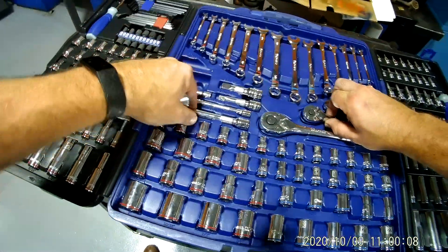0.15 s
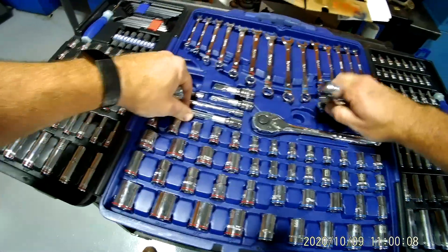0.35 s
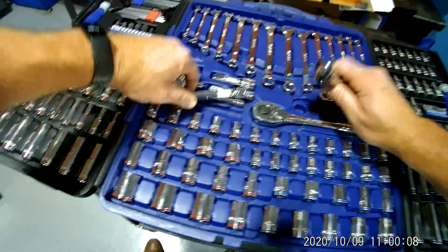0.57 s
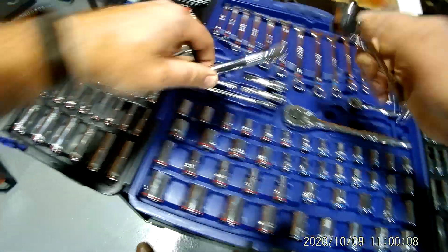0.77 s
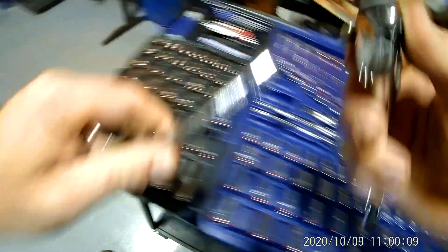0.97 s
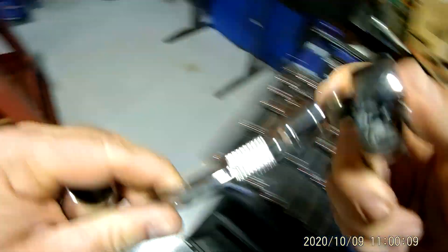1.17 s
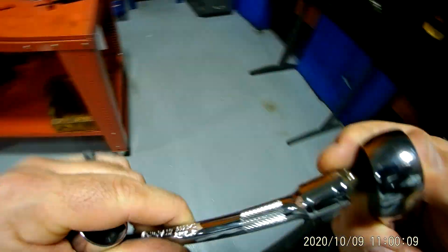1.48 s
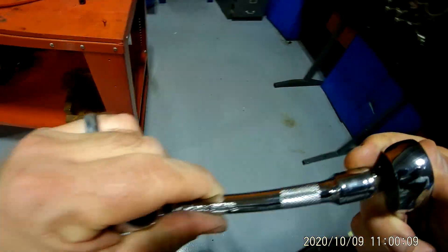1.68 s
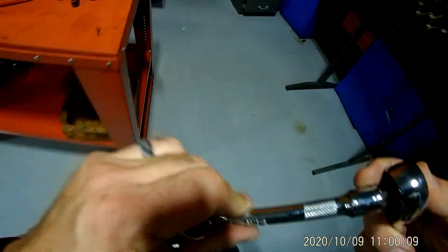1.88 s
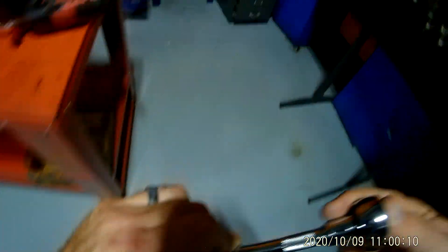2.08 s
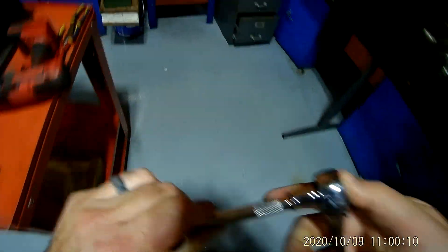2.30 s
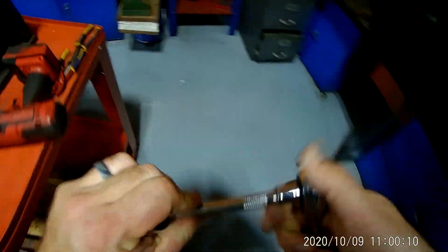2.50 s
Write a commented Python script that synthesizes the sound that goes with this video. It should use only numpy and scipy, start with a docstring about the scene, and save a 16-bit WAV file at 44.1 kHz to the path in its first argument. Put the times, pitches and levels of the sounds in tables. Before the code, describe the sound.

Close by in a hard-floored workshop, steel tools clatter in a socket tray and one clinks brightly. A tiny metal squeak and scattered clicks follow, with hands rubbing softly, then a ratchet gives a short, slowing run of clicks.

```python
"""A workshop, close up: steel tools are lifted out of a moulded socket case.
They knock in the hollow tray, jostle loose sockets and clink on one. An extension bar scrapes free
with a stick-slip squeak and clicks onto a ratchet, whose pawl then rings over its teeth in one quick,
slowing turn. Hands rub on the grip; the bench and a hard-floored room echo."""
import sys
import numpy as np
from scipy import signal
from scipy.fft import rfft, irfft
from scipy.io import wavfile
from scipy.ndimage import uniform_filter1d

SR = 44100
rng = np.random.default_rng(int(sys.argv[2]) if len(sys.argv) > 2 else 0)


def master(y):
    """Save y as 16-bit WAV."""
    cut = np.clip(np.atleast_2d(y).T, -1, 1)
    pcm = np.round(cut * 32767)  # scale
    wavfile.write(sys.argv[1], SR, pcm.astype(np.int16))


N = 116865
AGE_S = np.arange(int(0.8 * SR)) / SR  # time since a contact
CONTACT_RISE_S = 0.00022

# modes of the loaded tray: pitch_hz, level_db, t60_s
TRAY_MODES = [(700, -10.5, 0.015), (920, -6, 0.025), (1099, -0.5, 0.024), (1214, -1.5, .027),
              (1630, -16, .025), (2080, -18.5, 0.014), (2260, -14.5, 0.024), (2596, -21.5, .02),
              (3960, -21.5, .022), (5600, -19, 0.017)]
# spectra of a dull thump, a tick on the tray and a tick on steel: freq_hz, density_db
THUMP_SPECTRUM = [(30, -32), (90, -23), (150, -4), (320, 0), (600, -2), (1200, -9.5), (1700, -17.5),
                  (3000, -37.5), (8000, -60), (16000, -79)]
TRAY_TICK_SPECTRUM = [(100, -14), (1000, 0.5), (2200, 0.5), (3000, -11.5), (4000, 0), (5800, -4.5),
                      (7000, -12), (8200, -14), (8900, -48.5), (16000, -71.5)]
STEEL_TICK_SPECTRUM = [(100, -16.5), (700, -10.5), (1500, 0.5), (2100, -5), (2900, -8), (4000, 2.5),
                       (6200, -1), (7200, -7), (8200, -8.5), (8900, -43.5), (16000, -67)]


def amp(db):
    """Decibels to gain."""
    return 10 ** (np.asarray(db) / 20)


def log_interp(points, hz):
    """Interpolates a table on a log-frequency axis."""
    freq_hz, value = np.transpose(points)
    return np.interp(np.log(hz + 1), np.log(freq_hz + 1), value)


def add(mix, start_s, sound):
    """Mixes a sound in at start_s."""
    part = mix[max(round(start_s * SR), 0):][:len(sound)]
    part += sound[:len(part)]


def noise(spectrum, size):
    """Coloured noise, rms 1."""
    gain = amp(log_interp(spectrum, np.fft.rfftfreq(size, 1 / SR)))
    x = irfft(rfft(rng.standard_normal(size)) * gain, size)
    return x / x.std()


def burst(spectrum, rise_s, decay_s):
    """Dense, quickly dying resonances, as decaying noise."""
    return noise(spectrum, len(AGE_S)) * (1 - np.exp(-AGE_S / rise_s)) * np.exp(-AGE_S / decay_s)


def ring(modes, scale=1, detune=0.005):
    """Struck modes, slightly detuned by each contact."""
    t = AGE_S[AGE_S < 2 * max(t60_s for _, _, t60_s in modes)]
    out = np.zeros(len(AGE_S))
    for k, (pitch, level_db, t60_s) in enumerate(modes):
        pitch_hz = pitch * scale * (1 + detune * rng.uniform(-1.2, 1))
        out[:len(t)] += (-1) ** k * amp(level_db - 60 * t / t60_s) * np.sin(2 * np.pi * pitch_hz * t)
    return out * (1 - np.exp(-AGE_S / CONTACT_RISE_S)) ** 2


def background():
    """Faint, steady low noise."""
    # noise spectrum: freq_hz, density_db
    spectrum = [(20, -3), (35, -6.5), (60, -10), (100, -7), (145, -3.5), (175, -9.5), (280, -9.5),
                (420, -12), (750, -16), (1500, -25), (3000, -32), (6000, -36.5), (9000, -37),
                (14500, -37.5), (16000, -47.5)]
    return amp(-60.5) * noise(spectrum, N)


def hands():
    """Hands rub softly on the handle and stop the turn with a dull bump."""
    # rub envelope: time_s, level_db
    rub_levels = [(0, -64), (.16, -63.5), (.2, -68), (.7, -50.5), (1, -59.5), (1.28, -57), (1.5, -68),
                  (1.859, -76.5), (1.93, -61.5), (2.16, -53), (2.25, -60), (2.36, -58), (2.46, -56),
                  (2.65, -58.5)]
    # rub spectrum: freq_hz, density_db
    rub_spectrum = [(60, -20.5), (250, -2), (600, -0.5), (1600, -4), (2800, -17), (4500, -14), (7500, -23),
                    (9500, -28.5), (16000, -40.5)]
    level_db = np.interp(np.arange(N) / SR, *np.transpose(rub_levels))
    out = amp(level_db) * noise(rub_spectrum, N)
    bump = amp(-34.5) * burst(THUMP_SPECTRUM, rise_s=0.013, decay_s=0.02)
    add(out, start_s=2.486, sound=bump)
    return out


def tray_knocks():
    """Each knock ticks, rings the tray and thumps the hollow case."""
    # tools on the tray: start_s, ring_db, thump_db, tick_db, tick_decay_s, pitch_ratio
    knocks = [(0.01, -73, -38, -72, .004, 1), (0.207, -40.5, -40, -55, .004, 1.05),
              (0.2147, -19.5, -31, -45, .006, 1.013), (0.225, -31.5, -30.5, -47.5, .006, 0.94),
              (0.2511, -16.5, -33, -29, 0.0024, .94), (0.3244, -7.5, -21, -25.5, .003, 0.99),
              (0.3507, -15.5, -25, -17.5, .004, 0.99), (0.354, -6, -18, -28.5, 0.0063, 0.99),
              (0.3642, -23, -24.5, -41, 0.0061, 0.88), (0.3838, -17.5, -24.5, -30.5, 0.0034, 1.06),
              (.389, -17, -26, -36, .004, 0.93), (0.4988, -20, -31.5, -35, .004, 1.03),
              (.505, -28, -31, -45.5, .004, 1.03), (.551, -39, -39.5, -35, .003, 1),
              (.554, -23.5, -25, -42, .003, .8), (0.571, -18, -20.5, -30, .004, .93),
              (0.594, -32.5, -25.5, -37, .008, 1)]
    # air modes of the case: pitch_hz, level_db, t60_s
    air_modes = [(150.5, -12, .17), (204.2, -11, 0.098), (329, -4.5, .06), (435.2, -5.5, 0.072),
                 (600, -2.5, .035)]
    cutoff_hz = 109  # the knocks carry little below this
    out = np.zeros(N)
    for start_s, ring_db, thump_db, tick_db, tick_decay_s, pitch_ratio in knocks:
        thump = amp(-2) * burst(THUMP_SPECTRUM, rise_s=0.002, decay_s=0.013) + ring(air_modes)
        tray = ring(TRAY_MODES, pitch_ratio)
        tick = burst(TRAY_TICK_SPECTRUM, CONTACT_RISE_S, tick_decay_s)
        add(out, start_s, amp(ring_db) * tray + amp(thump_db) * thump + amp(tick_db) * tick)
    return signal.sosfilt(signal.butter(2, cutoff_hz, "highpass", fs=SR, output="sos"), out)


def treble_fizz():
    """A bright, brief fizz flickers high above some of the knocks."""
    # fizzes: start_s, level_db, decay_s
    fizzes = [(.1665, -47.5, 0.0023), (.369, -54.5, 0.035), (.592, -50, .04)]
    # fizz spectrum: freq_hz, density_db
    spectrum = [(100, -30), (5000, -11.5), (8000, -10), (10300, 0.5), (11500, -9.5), (13000, -13),
                (14400, -9.5), (16000, -22.5)]
    out = np.zeros(N)
    for start_s, level_db, decay_s in fizzes:
        add(out, start_s, amp(level_db) * burst(spectrum, rise_s=0.001, decay_s=decay_s))
    return out


def socket_rattle():
    """Jostled sockets tick against their slots at random between the knocks."""
    # spells of rattling: start_s, end_s, level_db
    spells = [(0.219, .32, -47), (.395, 0.551, -47)]
    ticks_per_spell, spread_db, pitch_spread = 14, 2.5, 0.13
    out = np.zeros(N)
    for start_s, end_s, level_db in spells:
        for place, force, pitch in rng.uniform(-1, 1, (ticks_per_spell, 3)):
            tick = burst(TRAY_TICK_SPECTRUM, CONTACT_RISE_S, decay_s=0.004)
            tray = amp(1.5) * ring(TRAY_MODES, 1 + pitch_spread * pitch)
            tick_s = start_s + (end_s - start_s) * (place + 1) / 2
            add(out, tick_s, amp(level_db + spread_db * force) * (tick + tray))
    return out


def ratchet_pawl():
    """The pawl snaps onto each tooth, rebounds once and rings at two pitches about an octave apart."""
    # one early click, then the turn: start_s, low_ring_db, high_ring_db, snap_db
    teeth = [(0.2349, -38.5, -95, -55), (2.278, -35.5, -79.5, -38.5), (2.2924, -25, -77, -35),
             (2.3034, -25, -69.5, -30), (2.314, -23, -63.5, -30.5), (2.3212, -18.5, -11.5, -33),
             (2.3283, -32.5, -30.5, -34), (2.3362, -32, -25, -27), (2.3432, -26, -23, -30),
             (2.3496, -32, -20, -31.5), (2.3564, -28, -23, -28), (2.3629, -28.5, -27, -32),
             (2.372, -31, -20, -30), (2.3775, -28, -16, -31.5), (2.3901, -24.5, -18, -31.5),
             (2.398, -26.5, -26, -32), (2.4097, -26, -20.5, -31.5), (2.4227, -25, -20.5, -33.5),
             (2.4403, -29, -23, -29.5), (2.4595, -22.5, -14, -35.5), (2.4737, -22, -18.5, -31.5),
             (2.489, -22.5, -31, -32.5), (2.498, -30.5, -60, -55)]
    # pawl modes: pitch_hz, level_db, t60_s
    low_modes = [(4844, 0, 0.047), (4877, -9.5, .022), (4753, -9, 0.017), (4000, -19, 0.027),
                 (5840, -19.5, 0.02), (6580, -16.5, .025), (1440, -22.5, 0.022)]
    high_modes = [(9890, 0, 0.025), (9690, -11, .014), (14200, -27, 0.023)]
    # spectra of the snap and its bright top: freq_hz, density_db
    snap_spectrum = [(200, -18), (800, -14.5), (1500, -10), (2800, -15), (4000, 0), (6200, 2.5), (7200, -8),
                     (8300, -4), (9000, -38), (16000, -60.5)]
    sizzle_spectrum = [(100, -60), (7500, -40.5), (8800, -2), (9900, 9.5), (11000, 1), (13000, -4.5),
                       (14500, 1), (15600, -5.5), (16500, -22)]
    hard_db = -28  # a weaker high ring means a softer, duller snap
    rebound_s, rebound_db = 0.004, -11
    out = np.zeros(N)
    for start_s, low_ring_db, high_ring_db, snap_db in teeth:
        sizzle_db = -3 + min(0, high_ring_db - hard_db)
        sizzle = amp(sizzle_db) * burst(sizzle_spectrum, rise_s=0.00017, decay_s=0.0041)
        snap = amp(snap_db) * (sizzle + burst(snap_spectrum, rise_s=0.00027, decay_s=0.0043))
        low_ring = ring(low_modes, detune=0.0055)  # each tooth loads the pawl differently
        add(out, start_s, amp(low_ring_db) * low_ring + amp(high_ring_db) * ring(high_modes) + snap)
        add(out, start_s + rebound_s * rng.uniform(0.7, 1.3), amp(rebound_db) * snap)
    return out


def bar_clicks():
    """Steel clicks, damped by the grip: the ratchet is picked up, the bar scrapes and seats on it."""
    # steel on steel: start_s, ring_db, tick_db, pitch_hz
    taps = [(.266, -29.5, -42, 4900), (.893, -43, -60, 4944), (1.017, -46, -53.5, 4092),
            (1.0354, -24.5, -29.5, 7680), (1.0388, -35, -38, 6740), (1.042, -25.5, -40, 6830),
            (1.0435, -32, -40, 7040), (1.047, -25, -33.5, 7050), (1.221, -52, -54, 9640),
            (1.2384, -37.5, -36.5, 6860), (1.253, -55, -49, 6940), (1.3263, -27.5, -31.5, 6770),
            (1.3343, -17, -26.5, 6800), (1.742, -58.5, -60.5, 4030), (1.8819, -25.5, -34.5, 6110),
            (1.883, -36.5, -42, 4140), (1.9908, -47.5, -57, 6070), (1.9959, -38.5, -52, 6160),
            (1.996, -34, -58, 4970), (2.2329, -29.5, -41, 5860), (2.2335, -30.5, -43, 4850)]
    # modes of the held bar: pitch_ratio, level_db, t60_s
    bar_modes = [(.215, -15, 0.015), (.28, -19, .016), (.37, -16, .012), (.485, -17, 0.013),
                 (.72, -14.5, .015), (.84, -12.5, 0.01), (.92, -6.5, .014), (1, -1, 0.019)]
    out = np.zeros(N)
    for start_s, ring_db, tick_db, pitch_hz in taps:
        bar = ring(bar_modes, pitch_hz)
        tick = burst(STEEL_TICK_SPECTRUM, rise_s=0.00027, decay_s=0.0021)
        add(out, start_s, amp(ring_db) * bar + amp(tick_db) * tick)
    return out


def socket_clink():
    """The bar strikes a socket, chatters and rings freely after the last contact."""
    # bar on socket: start_s, ring_db, tick_db
    clinks = [(0.5713, -16.5, -23), (.5727, -20.5, -23.5), (.591, -44.5, -44.5)]
    # modes of bar and socket in contact, then of the freed steel: pitch_hz, level_db, t60_s
    contact_modes = [(1683, 4.5, 0.067), (1880, -9, 0.023), (2400, -13.5, 0.027), (4170, -4, 0.037),
                     (4576, 1, 0.024), (4740, -2, 0.029), (5240, -2.5, .028), (5600, -9, 0.018),
                     (5840, -14.5, 0.028), (6625, 3, 0.03), (6850, -4.5, .022), (7520, -14, .025),
                     (8370, -5, 0.032), (8580, -13.5, .06)]
    free_modes = [(1515, -53, 0.93), (1664, -40.5, 0.8), (4130, -56, .6), (4570, -41.5, 0.19),
                  (5373, -54.5, .3), (6600, -52, .6), (8700, -44.5, 0.54), (9220, -38.5, .17),
                  (12394, -56, .2), (14235, -48, .26)]
    out = np.zeros(N)
    for start_s, ring_db, tick_db in clinks:
        steel = ring(contact_modes)
        tick = burst(STEEL_TICK_SPECTRUM, CONTACT_RISE_S, decay_s=0.004)
        add(out, start_s, amp(ring_db) * steel + amp(tick_db) * tick)
    add(out, clinks[-1][0], ring(free_modes, detune=0))
    return out


def bar_squeak():
    """Steel sticks and slips on steel for an instant and sets high modes ringing."""
    # squeak contour: time_s, pitch_hz, level_db
    contour = [(1.04, 3394, -45), (1.046, 3354, -34.5), (1.051, 3190, -36.5), (1.057, 3300, -36),
               (1.063, 3544, -40.5), (1.07, 3410, -50), (1.08, 3440, -68)]
    # squeak partials: pitch_ratio, level_db
    partials = [(.5, -15.5), (1, -4.5), (2, 1), (3, -16)]
    # high steel modes: pitch_hz, level_db, t60_s
    high_modes = [(12420, -38, 0.056), (12460, -32.5, 0.08), (12480, -41, 0.062), (15350, -58, .07)]
    pitch_jitter, uneven_grip_db = 0.032, 3.5
    time_s, pitch_hz, level_db = np.transpose(contour)
    t = np.arange(time_s[0], time_s[-1], 1 / SR)
    wobble = uniform_filter1d(rng.standard_normal(N), size=40)
    slip_hz = np.interp(t, time_s, pitch_hz) * (1 + pitch_jitter * wobble[:len(t)] / wobble.std())
    phase = 2 * np.pi * np.cumsum(slip_hz) / SR
    tone = sum(amp(partial_db) * np.sin(ratio * phase) for ratio, partial_db in partials)
    grip = uniform_filter1d(rng.standard_normal(N), size=50)
    slip_db = np.interp(t, time_s, level_db) + uneven_grip_db * grip[:len(t)] / grip.std()
    out = np.zeros(N)
    add(out, time_s[0], amp(slip_db) * tone)
    add(out, time_s[0], ring(high_modes))
    return out


def scramble_echoes(tail):
    """Moving tools and hands scramble the echo paths, widening high rings in the tail."""
    diffuse_above_hz = 2600
    hz, _, frames = signal.stft(tail, SR, nperseg=384, noverlap=288)
    scramble = 2 * np.exp(2j * np.pi * rng.random(frames.T.shape).T)
    frames = frames * np.where(hz[:, None] > diffuse_above_hz, scramble, 1)
    return signal.istft(frames, SR, nperseg=384, noverlap=288)[1][:N]


def workshop_echoes(x):
    """Quick echoes off the case and bench, then the tail of a hard-floored room."""
    # room decay: freq_hz, t60_s
    decay = [(120, 0.86), (400, 0.9), (1500, 1), (5000, 0.7), (9000, 0.52), (15000, 0.02)]
    # reverberation spectrum: freq_hz, level_db
    spectrum = [(100, -5.5), (300, -10.5), (500, -10.5), (1200, -13.5), (2000, -14.5), (3000, -11.5),
                (5000, -16), (7000, -20), (9000, -17), (15000, -18.5)]
    near_db, near_t60_s, near_delay_s, tail_rise_s = -12.5, 0.1, 0.002, 0.0065
    hz, t, frames = signal.stft(rng.standard_normal(SR), SR, nperseg=256)
    t60_s = log_interp(decay, hz)[:, None]
    envelope = amp(log_interp(spectrum, hz)[:, None] - 60 * t / t60_s)
    energy_norm = np.sqrt(2 * np.log(1000) / (t60_s * SR))
    tail_ir = signal.istft(frames * envelope * energy_norm, SR, nperseg=256)[1][:len(AGE_S)]
    tail_ir *= 1 - np.exp(-AGE_S / tail_rise_s)
    near_ir = rng.standard_normal(len(AGE_S)) * amp(-60 * AGE_S / near_t60_s) * (AGE_S > near_delay_s)
    near = signal.fftconvolve(x, near_ir / np.linalg.norm(near_ir))[:N]
    return amp(near_db) * near + scramble_echoes(signal.fftconvolve(x, tail_ir)[:N])


def scene():
    """The case stands at arm's length; the held tools are nearer and drier."""
    case = tray_knocks() + socket_rattle()
    sockets = socket_clink() + treble_fizz()
    bar = bar_clicks() + bar_squeak()
    pawl = ratchet_pawl()
    room = workshop_echoes(amp(0.5) * case + amp(-0.5) * sockets + amp(-5) * bar + amp(-8) * pawl)
    return (case + sockets + bar + pawl + room + hands() + background())[None]


def record(dry):
    """Band limit."""
    cutoff_hz = 16400
    lowpass = signal.firwin(255, cutoff_hz, window=("kaiser", 9), fs=SR)
    return signal.oaconvolve(dry, lowpass[None], "same")


dry = scene()
out = record(dry)
master(out)
```